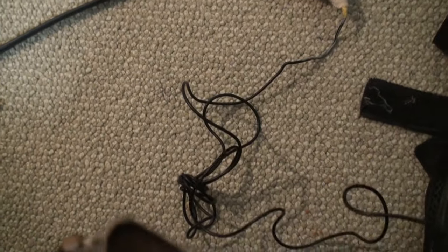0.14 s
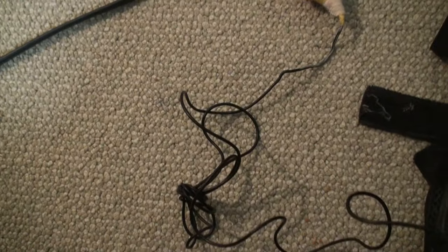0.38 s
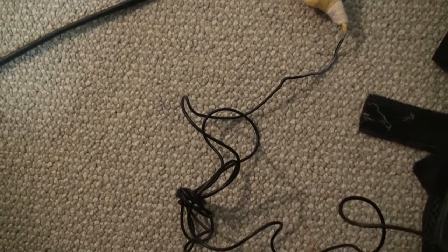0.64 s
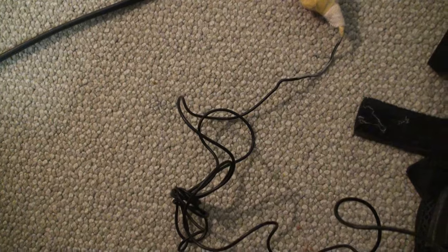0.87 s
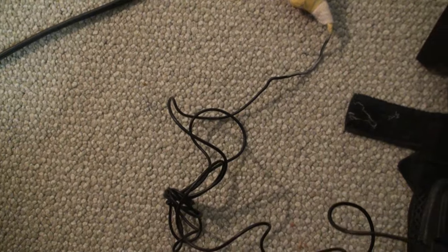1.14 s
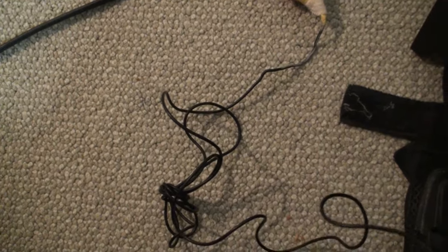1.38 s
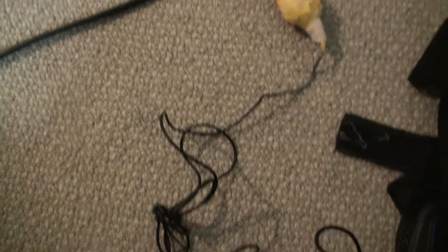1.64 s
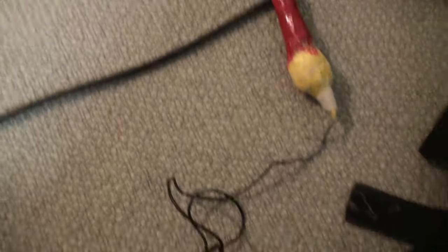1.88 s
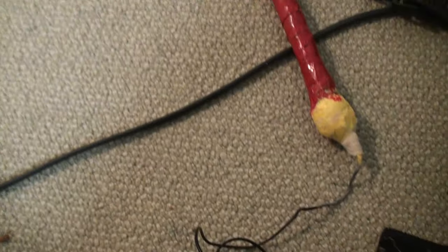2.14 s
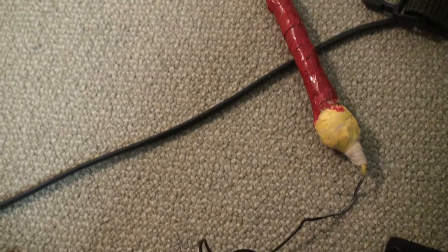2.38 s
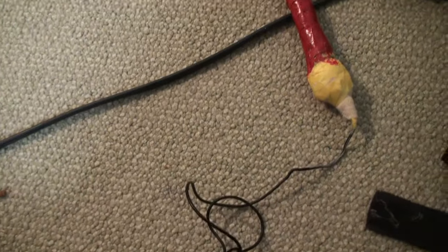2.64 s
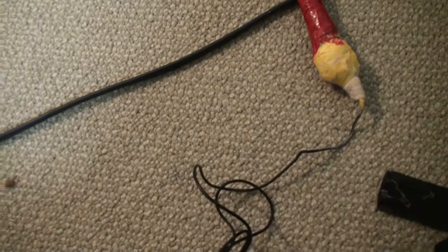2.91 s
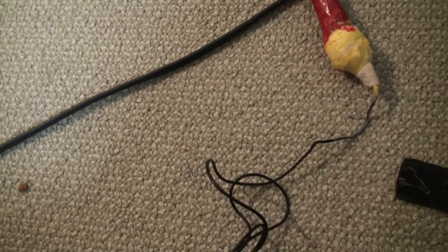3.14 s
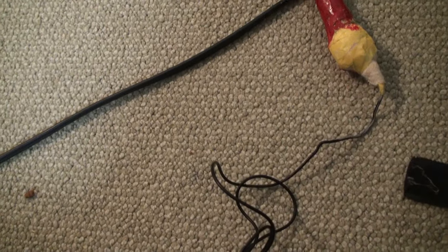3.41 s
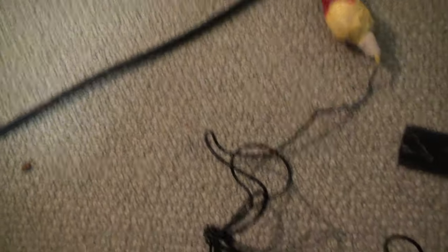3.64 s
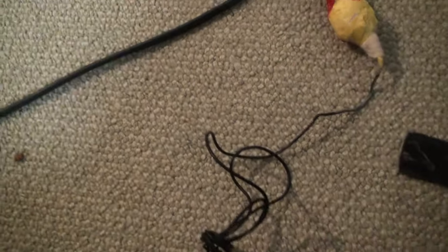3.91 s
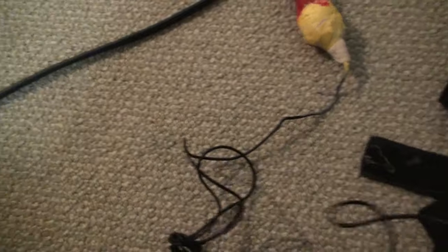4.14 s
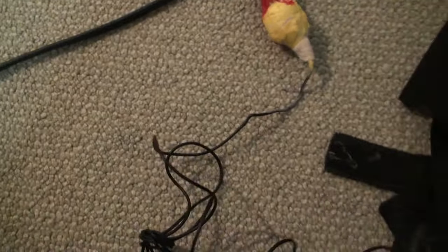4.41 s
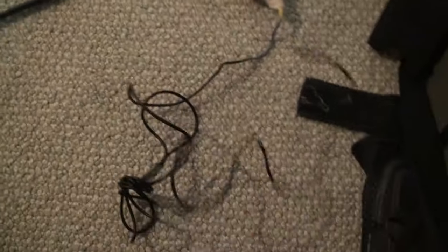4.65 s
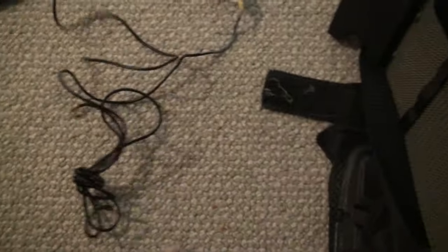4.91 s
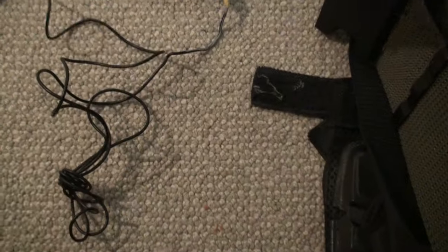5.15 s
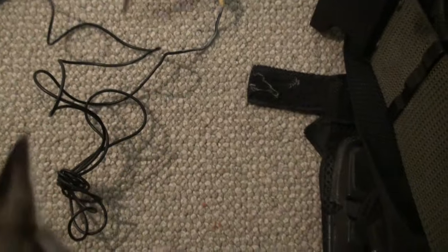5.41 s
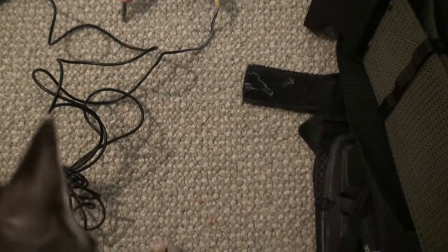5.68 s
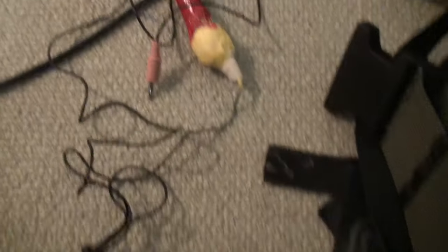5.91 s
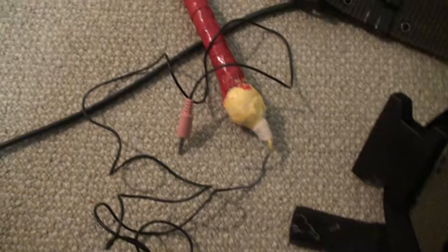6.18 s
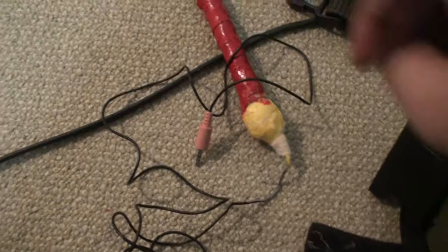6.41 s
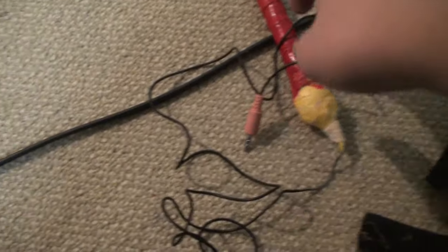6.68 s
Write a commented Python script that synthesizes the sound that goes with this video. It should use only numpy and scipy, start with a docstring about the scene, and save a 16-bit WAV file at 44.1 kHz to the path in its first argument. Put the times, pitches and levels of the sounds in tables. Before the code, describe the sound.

Small stereo microphone inside a handled camera: dry plastic clicks and short squeaky creaks dominate the first four seconds, loudest as a sharp crack near the end. Then the grip goes still, leaving low muffled paw steps on a carpeted wooden floor, a small knock around five and a half seconds, soft fabric-like rustles and steady hiss.

```python
"""In a room with carpet on a wooden floor, a hand shifts its grip on a small plastic camcorder.
The housing creaks and snaps: stick-slip contacts set its damped modes ringing at two ports.
A kitten pads about, exciting floorboard modes; a batted toy and a cord end knock as short ringing bursts.
Fur, cloth and cord brush the pile as swelling noise; delays with feedback make the room's echoes.
The room and the microphone hiss softly as steady banded noise."""
import sys
import numpy as np
from scipy import signal
from scipy.io import wavfile

SR = 44100
rng = np.random.default_rng(int(sys.argv[2]) if len(sys.argv) > 2 else 0)


def field_ratio(decibels):
    """Amplitude ratio for a level in dB (20 dB per decade); scalars and array-likes work."""
    return 10 ** (np.asarray(decibels, dtype=float) / 20)


def file_out(sig):
    """Save sig as 16-bit WAV at sys.argv[1]."""
    # one column per channel
    cols = np.atleast_2d(sig).T
    # limit, then scale
    lim = np.clip(cols, -1, 1)
    pcm = np.round(lim * 32767).astype(np.int16)
    wavfile.write(sys.argv[1], SR, pcm)


N = 299791


def rms_one(x):
    """Normalization: the root-mean-square value becomes 1."""
    return x / np.sqrt(np.mean(x ** 2) + 1e-20)


def in_time(rows, column=1):
    """Linear interpolation: one column of a curve, read at every sample."""
    table = np.array(rows)
    return np.interp(np.arange(N) / SR, table[:, 0], table[:, column])


def at_hz(points, hz):
    """Spectral interpolation on a logarithmic frequency axis."""
    table = np.array(points)
    return np.interp(np.log(hz), np.log(np.maximum(table[:, 0], 1)), table[:, 1])


def drift(rate_hz):
    """Low-pass random process: slow chance of rms 1, computed at every 40th sample."""
    r = np.exp(-2 * np.pi * rate_hz * 40 / SR)
    white = rng.standard_normal(N // 40 + 2002)
    slow = signal.lfilter([1], [1, -2 * r, r * r], white)[2000:]
    return np.interp(np.arange(N) / 40, np.arange(len(slow)), rms_one(slow))


def ring(clicks, hz, t60, phase=0):
    """Damped resonance: a unit click starts a decaying sine of height 1 at the given phase."""
    r = field_ratio(-60 / (t60 * SR))
    w = 2 * np.pi * hz / SR
    start = [np.sin(phase), r * np.sin(w - phase)]
    return signal.lfilter(start, [1, -2 * r * np.cos(w), r * r], clicks + 1e-18)


def soften(x, seconds):
    """Finite contact time: smoothing by a push that swells and fades."""
    shape = np.hanning(round(seconds * SR) + 3)[1:-1]
    return signal.lfilter(shape / shape.sum(), [1], x)


def swell(hz, seconds):
    """Gradual excitation: a contact feeds a mode over a few cycles, so its ring swells in."""
    window = np.hanning(round(seconds * SR) + 3)
    t = (np.arange(len(window)) - len(window) / 2) / SR
    return 2 * window * np.cos(2 * np.pi * hz * t) / window.sum()


# correlation of left and right in diffuse noise: (f/Hz, correlation)
CORRELATION = [(60, 0.89), (130, 0.98), (290, 0.16), (640, 0.1), (1410, 0.008), (3100, 0.02), (6820, 0.26),
               (15000, 0.96)]


def banded_noise(spectrum, flicker_db):
    """Partial coherence: each 0.4-octave band of stereo noise flickers on its own; rms 1 overall."""
    edges = 22 * 2 ** np.arange(0, 9.7, .4)
    white = rng.standard_normal((2, 2, N))
    out = 0
    for k, (low, high) in enumerate(zip(edges, edges[1:])):
        hz = np.sqrt(low * high)
        if hz <= spectrum[0][0]:
            continue
        band = signal.butter(2, [low, high], "band", fs=SR, output="sos")
        mid, side = signal.sosfilt(band, white[k % 2])
        alike = np.clip(at_hz(CORRELATION, hz), -1, 1)
        gain = field_ratio(at_hz(spectrum, hz) + flicker_db * drift(11.5))
        out = out + gain * (np.sqrt(1 + alike) * mid + np.sqrt(1 - alike) * side * [[1], [-1]])
    return rms_one(out)


def through_housing(modes, at, strength_db, pan_db, scatter_db):
    """Modal superposition: each contact rings every mode, with chance strength and its own phase per port."""
    contact_cycles, split_hz = 3.2, 1100   # below the split all modes move in the same sense
    out = np.zeros((2, N))
    luck = rng.standard_normal((len(at), len(modes), 2))
    for k, (hz, mode_db, t60, lead) in enumerate(modes):
        port_db = scatter_db * luck[:, k].T + np.outer([.5, -.5], pan_db)
        heights = field_ratio(strength_db(hz) + mode_db + port_db)
        push = swell(hz, contact_cycles / max(hz, 400))
        # centred pushes let all modes crest together
        span = np.maximum(at[:, None] + np.arange(len(push)) - len(push) // 2, 0)
        sense = (-1) ** (k * (hz > split_hz))   # upper neighbours move in opposite sense
        for port, sign in enumerate((1, -1)):
            pushes = np.bincount(span.ravel(), np.outer(heights[port], push).ravel(), N)
            out[port] += ring(pushes, hz, t60, sign * lead / 2) * sense
    return out


# modes of the plastic housing: (f/Hz, relative level/dB, t60/s, phase lead of left/rad)
HOUSING_MODES = [(209, -10.5, 0.032, 1.3), (258, -6.5, 0.11, 0.57), (344.7, -3, 0.054, 1.55),
                 (457, -10, 0.056, 1.7), (560, -0.5, 0.029, 0.49), (700, 5.5, 0.017, 1.36),
                 (860.7, 2, 0.033, 1.1), (971, 3, 0.018, 1.5), (1171, 3, 0.021, 1.65),
                 (1390, 4, 0.026, 1.82), (1755, 7.5, 0.016, 1.85), (2060, -1.5, 0.038, 1.63),
                 (2373, 3.5, 0.011, 1.2), (2784, 3.5, 0.0066, 1.53), (3370, 7.5, 0.0029, 1.7)]
# the changing grip: (t/s, rubbing level/dB, depth level/dB, left-right level/dB of the busiest finger)
# a full palm drives the lowest modes, fingertips do not
GRIP_CURVE = [(0, -62, -40, -2.5), (.25, -80, -20, 0.5), (.4, -87, -37, 0), (.7, -69, -25.5, 1),
              (1.1, -84, -27.5, 1.5), (1.25, -85, -25, -1.5), (1.5, -60.5, -29.5, 0.5), (2, -60.5, -31, 1),
              (2.5, -62, -16, 0), (2.95, -58.5, -18, 1.5), (3.22, -71, -19, -2), (3.3, -72, -32, 2),
              (3.45, -61, -31.5, -1), (3.8, -62, -26, -0.5), (4.1, -64.5, -21, 0.5), (4.2, -87, -28, 0)]
# single slips of skin on the housing: (t/s, relative peak level/dB, f/Hz, bite level/dB)
SINGLE_SLIPS = [(0.098, -46, 1100, 2), (0.211, -37.5, 760, -9), (0.3, -34, 660, -15),
                (0.328, -37.5, 810, -14), (0.354, -44, 835, -13), (0.491, -46, 532, -28),
                (0.794, -37.5, 636, -29), (0.804, -37, 690, -30), (0.815, -36.5, 756, -15),
                (0.824, -31.5, 830, -23), (0.915, -41, 894, -25), (0.95, -36.5, 560, -16),
                (0.968, -27, 564, -1.5), (1.012, -41, 557, -18), (1.123, -37, 670, -21),
                (1.329, -31, 694, 0.5), (1.341, -32, 654, -24), (1.351, -28, 1054, 3.5),
                (1.47, -24.5, 680, -8), (1.564, -32.5, 570, -20), (1.59, -42.5, 598, -6),
                (1.638, -35, 579, -8), (1.8, -38.5, 830, -20), (2.022, -37.5, 844, -2.5),
                (2.198, -34, 789, -12), (2.321, -42, 982, -5), (2.366, -38, 700, -15),
                (2.498, -27, 863, -10.5), (2.516, -23.5, 643, -20), (2.527, -29, 730, -16),
                (2.538, -28.5, 680, -26), (2.551, -37, 660, -31), (2.562, -35, 710, -30),
                (2.579, -33.5, 643, -35), (2.629, -27, 625, -24), (2.683, -41.5, 855, -9),
                (2.781, -41.5, 870, -11), (2.793, -35.5, 676, -13.5), (2.831, -32.5, 600, -10.5),
                (2.86, -30.5, 554, -10), (2.888, -28.5, 580, -7), (2.923, -31, 630, -6),
                (2.988, -29.5, 970, -5), (2.997, -28, 720, -12), (3.055, -29, 630, -8),
                (3.06, -28.5, 1080, -5), (3.065, -26, 555, -4), (3.135, -21.5, 954, -5),
                (3.141, -29, 683, -7.5), (3.166, -32.5, 806, -21), (3.354, -36.5, 475, -20),
                (3.406, -34.5, 880, -8.5), (3.426, -28, 646, -3), (3.541, -27, 683, -12),
                (3.554, -34, 754, -6.5), (3.567, -28, 730, -24), (3.578, -30.5, 603, -13),
                (3.591, -40, 590, -23), (3.614, -48, 650, -25), (3.627, -34.5, 750, -15),
                (3.656, -31.5, 590, -8.5), (3.676, -33, 515, -13), (3.72, -44, 893, -21),
                (3.746, -38.5, 827, -15), (3.768, -32, 966, -5), (3.779, -17, 780, -7.5),
                (3.829, -12, 990, -10), (3.834, -19.5, 874, -5), (3.841, -16, 860, -2),
                (3.863, -33, 657, 3), (3.912, -45, 1147, -19), (3.967, -45, 1000, -2),
                (4.015, -36, 1380, -4.5)]


def slips(rows=SINGLE_SLIPS, focus_db=13.0, body_db=-7, scatter_db=2, roll_off=0.57):
    """Stick-slip excitation: pitch picks the middle modes, bite the upper ones, grip depth the lowest."""
    crest_s, wander_db = .0015, 2   # delay from start to crest; each contact lands a little elsewhere
    s, peak_db, pitch, bite_db = np.transpose(rows)
    at = np.round((s + crest_s) * SR).astype(int)
    depth_db = in_time(GRIP_CURVE, column=2)[at]
    pan_db = in_time(GRIP_CURVE, column=3)[at] + wander_db * rng.standard_normal(len(s))

    def strength_db(hz):
        if hz > 1500:   # a dull slip loses the top first
            return peak_db + bite_db * (1 + roll_off * np.log2(hz / 2000)) - 4.5
        if hz < 350:
            return peak_db + depth_db
        return peak_db + body_db - focus_db * np.log2(hz / pitch) ** 2   # loss per octave squared

    return through_housing(HOUSING_MODES, at, strength_db, pan_db, scatter_db)


# runs of fast slips: (start t/s, end t/s, slip rate/Hz, relative peak level/dB, f/Hz)
CREAK_RUNS = [(0.036, 0.12, 300, -49, 935), (0.138, 0.181, 154, -50.5, 780), (0.173, .230, 149, -46, 680),
              (0.439, 0.61, 71, -51.5, 570), (0.827, 0.86, 234, -33.5, 830),
              (0.916, 0.941, 200, -44.5, 710), (1.013, 1.057, 110, -48, 720),
              (1.298, 1.343, 237, -26.5, 897), (1.568, 1.613, 326, -48.5, 730),
              (1.62, 1.669, 260, -41.5, 660), (1.648, 1.715, 387, -46.5, 870),
              (1.716, 1.792, 310, -61, 917), (1.811, 1.833, 320, -50.5, 1010),
              (1.9, 2.008, 270, -58.5, 965), (2.087, 2.12, 302, -46.5, 970), (2.153, 2.207, 270, -57, 928),
              (2.202, 2.236, 300, -47, 950), (2.239, 2.259, 287, -36, 1044), (2.388, 2.405, 270, -34, 560),
              (2.409, 2.434, 150, -29.5, 560), (2.625, 2.700, 140, -53, 830),
              (3.141, 3.189, 220, -39.5, 702), (3.465, 3.488, 260, -37.5, 652),
              (3.482, 3.53, 180, -27.5, 826), (3.697, 3.726, 180, -44.5, 766), (3.79, 3.794, 500, -42, 870),
              (3.841, 3.857, 420, -31, 1210), (3.858, 4.08, 230, -57.5, 1010)]
# how tightly the skin is stretched, which sharpens every creak: (t/s, bite level/dB)
SKIN_STRETCH = [(0, 2.5), (.3, -5), (.8, -5.5), (1.35, -4), (1.6, 0), (2.3, 2.5), (2.6, 6), (3.2, 2),
                (3.5, 5), (3.7, -4), (3.85, 4.5)]


def creaks():
    """Repeated stick-slip: nearly even slips swell and fade, loudest near the middle of each run."""
    uneven, spread_db = .07, 1.5   # timing scatter in slip periods; level scatter
    stretch_db = in_time(SKIN_STRETCH)
    luck = rng.standard_normal((len(CREAK_RUNS), 2, 64))
    rows = []
    for (start, end, per_s, peak_db, pitch), (early, size) in zip(CREAK_RUNS, luck):
        s = start + (np.arange(64) + .5 + uneven * early) / per_s
        progress = np.clip((s - start) / (end - start), 1e-3, 1 - 1e-3)
        envelope = np.sin(np.pi * progress ** 0.99)
        level_db = peak_db + 10 * np.log10(envelope + 0.025) + spread_db * size
        # a higher creak is sharper (dB per octave), a heavier one duller
        bite_db = -12 + stretch_db[round(start * SR)] + 15 * np.log2(pitch / 800) - 0.2954 * (peak_db + 45)
        rows += [(t, level, pitch, bite_db) for t, level in zip(s[s < end], level_db[s < end])]
    return slips(rows, focus_db=21.5, body_db=-6.5, scatter_db=1.2, roll_off=0.2)


# bright modes that only a sharp click wakes: (f/Hz, relative level/dB, t60/s, phase lead of left/rad)
BRIGHT_MODES = [(3420, 19, 0.0011, 0.21), (4980, 7.5, 0.0047, 1), (5670, 1.5, 0.011, 0.35),
                (6780, 12, 0.0018, 0.33), (8580, 11, 0.0023, 0.33), (10500, -10, 0.0066, 0.31),
                (13000, 13, 0.0014, .1), (14700, -4, 0.0041, .1)]
# spectrum of the fizz: (f/Hz, relative level/dB per Hz)
FIZZ_SPECTRUM = [(1500, -23), (2500, 7), (4000, 4), (6000, 1), (9000, -1), (12000, -6.5), (16000, -50)]
# bright snaps of the gripped housing, later bright clicks of toy and cord on the floor:
# (t/s, relative peak level/dB, centre f/Hz)
BRIGHT_SNAPS = [(0.2123, -47.5, 5260), (0.9684, -30.5, 4540), (1.03, -52, 3500), (1.3274, -34, 3530),
                (1.3527, -34.5, 3490), (1.4697, -43, 3500), (2.0223, -52, 4500), (2.2475, -44.5, 4140),
                (2.4998, -42.5, 3610), (2.5154, -51, 3540), (2.6333, -54, 4470), (2.8875, -46, 3790),
                (2.9225, -46, 3640), (2.99, -37, 4070), (3.0638, -36.5, 3820), (3.1361, -35, 3870),
                (3.427, -36, 4630), (3.7798, -36.5, 4320), (3.832, -17.5, 9760), (3.834, -28, 5760),
                (3.84, -24, 3570), (3.852, -44, 4600), (3.8633, -28, 5700), (4.0156, -43, 3740),
                (4.8535, -43.5, 3700), (4.9738, -53, 7640), (5.3985, -45, 3830), (5.47, -48.5, 6850)]


def snaps(level_db=-8, focus_db=5, pan_db=-3, scatter_db=2.5, fizz_db=-17, fizz_t60=0.086):
    """Impulsive excitation: a hard click rings the bright modes, trailed by exponentially dying noise."""
    s, peak_db, centre = np.transpose(BRIGHT_SNAPS)
    at = np.round(s * SR).astype(int)

    def strength_db(hz):
        return peak_db + level_db - focus_db * np.log2(hz / centre) ** 2

    click = through_housing(BRIGHT_MODES, at, strength_db, np.full(len(s), pan_db), scatter_db)
    fade = np.zeros(N)
    fade[at] = field_ratio(peak_db + fizz_db)
    fade = signal.lfilter([1], [1, -field_ratio(-60 / (fizz_t60 * SR))], fade + 1e-18)
    return click + fade * banded_noise(FIZZ_SPECTRUM, flicker_db=2.2)


def rubbing(per_s=170, spread_db=4.5, fall_db=4.0, rumble_db=-14.5):
    """Random stick-slip: dense uneven slips and a low rumble follow the restless grip."""
    at = np.cumsum(SR / per_s * rng.gamma(3, 1 / 3, 1500)).astype(int)
    at = at[at < GRIP_CURVE[-1][0] * SR]
    size_db = spread_db * rng.standard_normal(len(at))
    pan_db = in_time(GRIP_CURVE, column=3)[at]

    def strength_db(hz):
        return size_db - fall_db * np.abs(np.log2(hz / 800))   # loss per octave either side of 800 Hz

    creak = through_housing(HOUSING_MODES, at, strength_db, pan_db, scatter_db=6.5)
    creak = creak / np.std(creak[:, :at[-1]])
    band = signal.butter(2, [20, 60], "band", fs=SR, output="sos")
    rumble = rms_one(signal.sosfilt(band, rng.standard_normal(N)))
    return field_ratio(in_time(GRIP_CURVE)) * (creak + field_ratio(rumble_db) * rumble)


# floorboard modes: (f/Hz, relative level/dB, t60/s)
BOARD_MODES = [(60.5, -12, 0.19), (92.3, 1.5, 0.19), (112.5, -13, 0.82), (146.9, -5, 0.17),
               (185.8, -2, 0.18), (258.8, -2.5, 0.12), (348, -7, 0.043), (409, -2, 0.057),
               (564, -14.5, 0.11)]
# paws landing: (t/s, relative peak level/dB, hardness level/dB, f/Hz)
PAW_LANDINGS = [(2.096, -49.5, -24, 193), (2.753, -42.5, -3, 172), (3.838, -34.5, -19, 218),
                (3.975, -36.5, -5, 159), (4.101, -44.5, -3, 164), (4.115, -38, -31, 96),
                (4.244, -48.5, -16, 89), (4.645, -42, -24.5, 173), (4.855, -44.5, -3.5, 172),
                (5.225, -40, -5, 196), (5.392, -52, -2, 75), (5.473, -32.5, -16, 174),
                (5.717, -42.5, -6.5, 148), (5.989, -46.5, -28, 95), (6.29, -43, -8, 153),
                (6.437, -43.5, -19, 106), (6.448, -49, 0, 83), (6.691, -40.5, 0, 94)]


def paws(level_db=-9, focus_db=2.5, scatter_db=2, lag_cycles=.8):
    """Modal excitation by soft impact: low board modes answer late, a harder landing reaches higher ones."""
    s, peak_db, hard_db, pitch = np.transpose(PAW_LANDINGS)
    out = np.zeros(N)
    luck = rng.standard_normal((len(s), len(BOARD_MODES)))
    for k, (hz, mode_db, t60) in enumerate(BOARD_MODES):
        reach_db = hard_db + 9 if hz > 300 else -focus_db * np.log2(hz / pitch) ** 2
        clicks = np.zeros(N)
        clicks[np.round(s * SR).astype(int)] = field_ratio(
            peak_db + level_db + mode_db + reach_db + scatter_db * luck[:, k])
        out += soften(ring(clicks, hz, t60), lag_cycles / hz) * (-1) ** k
    no_deep_bass = signal.butter(2, 65, "high", fs=SR, output="sos")
    return signal.sosfilt(no_deep_bass, out)


# toy and cord end knocking on the floor: (t/s, relative peak level/dB, f/Hz, t60/s)
FLOOR_KNOCKS = [(4.853, -40, 1390, 0.022), (4.974, -47, 770, 0.0047), (5.04, -39.5, 820, 0.011),
                (5.182, -50.5, 900, 0.0091), (5.395, -51, 505, 0.018), (5.469, -21, 568, 0.0094),
                (6.373, -58, 890, 0.024)]


def knocks(level_db=5.0, overtone_db=-7, cycles=1.32, pan_db=1):
    """Inharmonic resonance: a short push on carpet rings a pitch and progressively weaker overtones."""
    out = np.zeros(N)
    for s, peak_db, hz, t60 in FLOOR_KNOCKS:
        for k, ratio in enumerate((1, 1.5, 2.1, 3.0)):
            burst = swell(ratio * hz, cycles / hz)
            push = np.zeros(N)
            push[round(s * SR):][:len(burst)] = burst * field_ratio(peak_db + level_db + k * overtone_db)
            out += ring(push, ratio * hz, t60)
    return out * field_ratio([[pan_db / 2], [-pan_db / 2]])


# spectrum of the brushed pile: (f/Hz, relative level/dB per Hz)
PILE_SPECTRUM = [(500, -34), (1200, -3.5), (2000, -4), (3000, -1.5), (6500, -5), (9000, -11.5),
                 (12000, -18), (16000, -23)]
# fur, cloth and cord brushing the pile: (crest t/s, crest level/dB, rise/s, fall/s)
# the level changes by swing_db in one rise or fall time
BRUSH_STROKES = [(.09, -65, 0.063, 0.055), (.74, -60, 0.059, 0.14), (.985, -58.5, 0.015, 0.098),
                 (3.758, -55, 0.043, 0.11), (3.845, -48, .012, .12), (4.45, -63, 0.37, .09),
                 (4.82, -69.5, 0.74, 0.14), (5.05, -69.5, 0.18, 0.45), (5.49, -66, .11, .08),
                 (5.705, -56.5, .012, 0.18), (5.85, -63, 0.26, 0.18), (6.21, -64, 0.21, 0.34),
                 (6.45, -64, 0.086, 0.069)]


def brushing(swing_db=20, sleeve_db=-8):
    """Friction noise: strokes over the pile swell and fade, and a sleeve hisses with the restless grip."""
    t = np.arange(N) / SR
    power = field_ratio(in_time(GRIP_CURVE) + sleeve_db) ** 2
    for s, peak_db, rise_s, fall_s in BRUSH_STROKES:
        away = np.where(t < s, (s - t) / rise_s, (t - s) / fall_s)
        power = power + field_ratio(peak_db - swing_db * np.minimum(away, 5)) ** 2
    return np.sqrt(power) * banded_noise(PILE_SPECTRUM, flicker_db=1.5)


def room(x, t60=0.15, wall_cut_hz=3600):
    """Reverberation: six feedback delays a side, each echo weaker and duller on every round."""
    out = np.zeros((2, N))
    dull = np.exp(-2 * np.pi * wall_cut_hz / SR)
    lags = (rng.uniform(.007, 0.036, 12) * SR).astype(int)
    for k, lag in enumerate(lags):
        loop, state = x.copy(), [0.]
        gain = field_ratio(-60 * lag / SR / t60)
        for i in range(lag, N, lag):
            back, state = signal.lfilter([gain * (1 - dull)], [1, -dull], loop[i - lag:i], zi=state)
            loop[i:i + lag] += back[:N - i]
        out[k % 2] += (loop - x) * (-1) ** (k // 2)
    return out


# spectrum of the room and microphone hiss: (f/Hz, relative level/dB per Hz)
AIR_SPECTRUM = [(15, -38), (25, -14), (80, -4), (317, -7), (775, -2), (840, -2), (911, -3), (1190, -4),
                (1370, -8), (2050, -7.5), (3250, -14), (4490, -14.5), (9840, -22.5), (12900, -19),
                (16000, -26.5)]


def air(level_db=-62.5):
    """Stationary background noise: the soft hiss of the room and the microphone."""
    return field_ratio(level_db) * banded_noise(AIR_SPECTRUM, flicker_db=1.3)


def scene():
    """Superposition: the hand on the housing, the play on the floor, the echoes and the hiss."""
    grip = slips() + creaks() + snaps() + rubbing()
    floor = paws() + knocks()
    # what is farther off is wetter
    walls = room(grip.mean(axis=0) + field_ratio(7.0) * floor.mean(axis=0))
    return grip + floor + brushing() + field_ratio(-19) * walls + air()


def low_pass(x):
    """Removes everything above the highest recorded frequency."""
    return signal.sosfilt(signal.butter(12, 16810, fs=SR, output="sos"), x)


def record(dry):
    """Recording: the finished mix becomes the sound as the camcorder stores it."""
    return low_pass(dry)


dry = scene()
out = record(dry)
file_out(out)
```